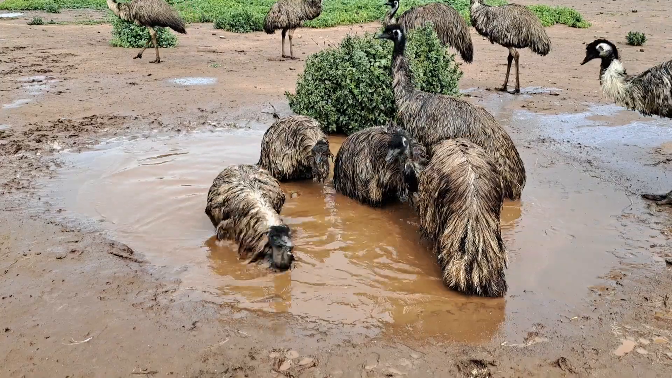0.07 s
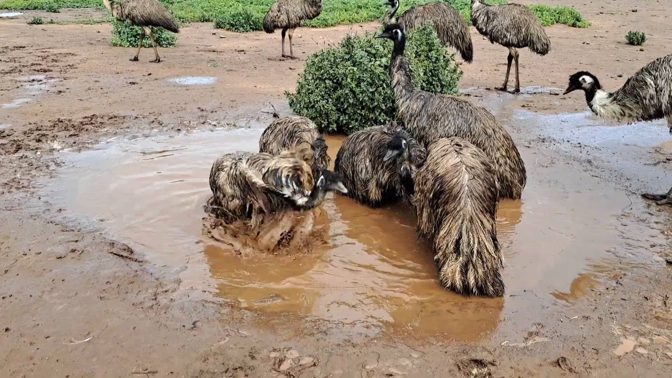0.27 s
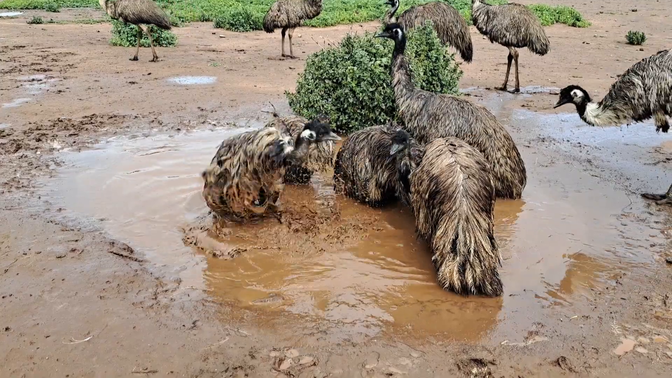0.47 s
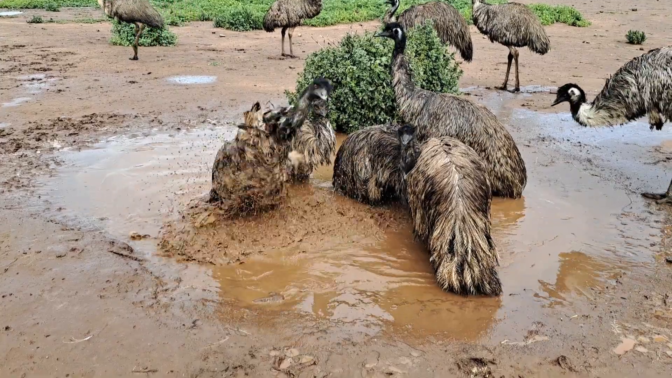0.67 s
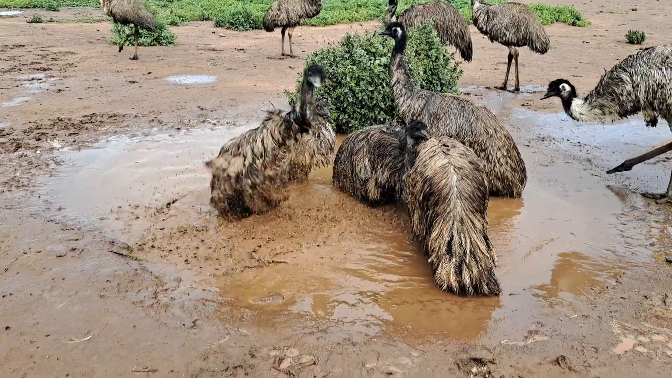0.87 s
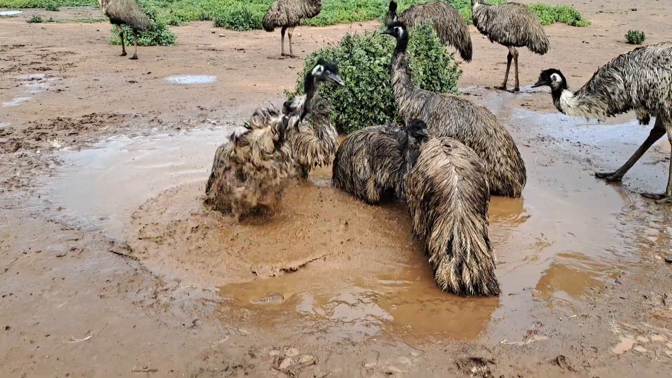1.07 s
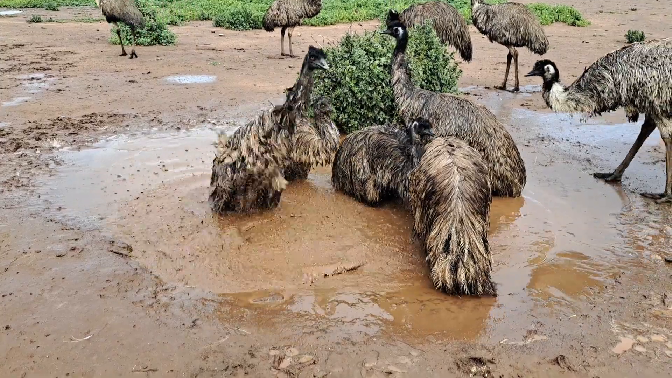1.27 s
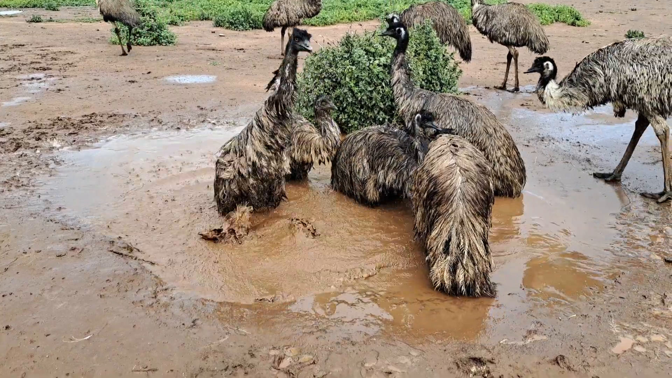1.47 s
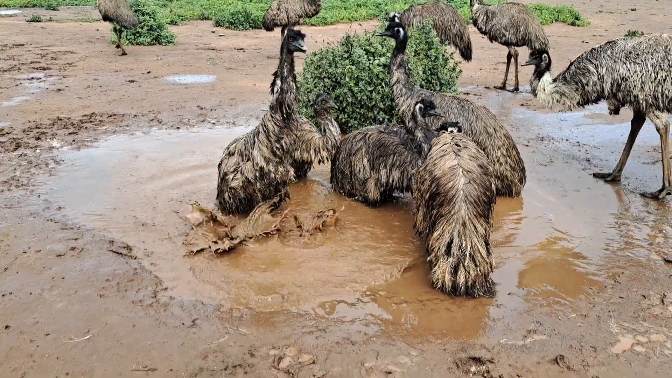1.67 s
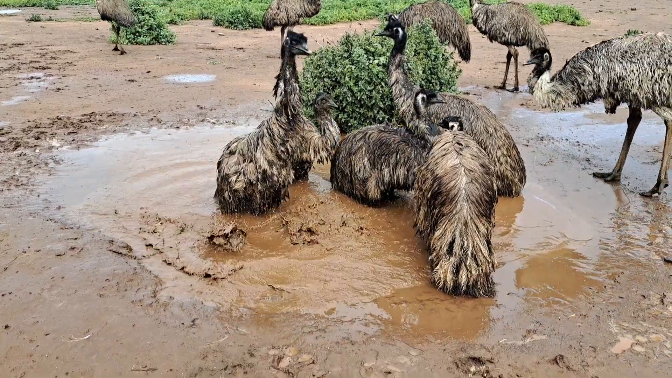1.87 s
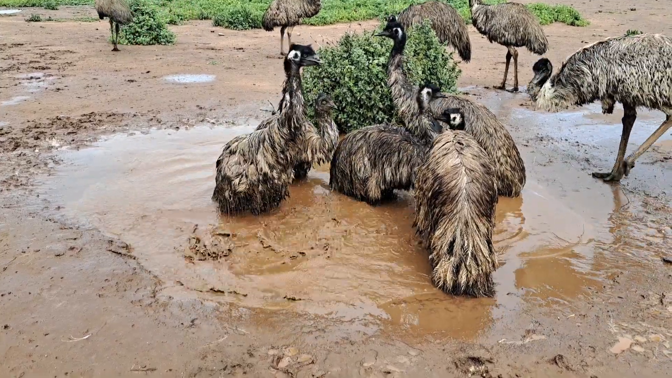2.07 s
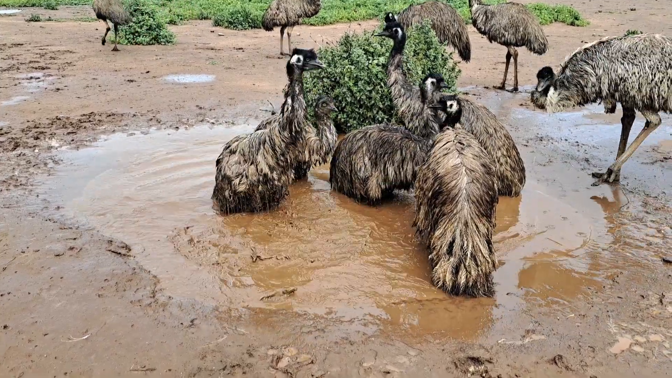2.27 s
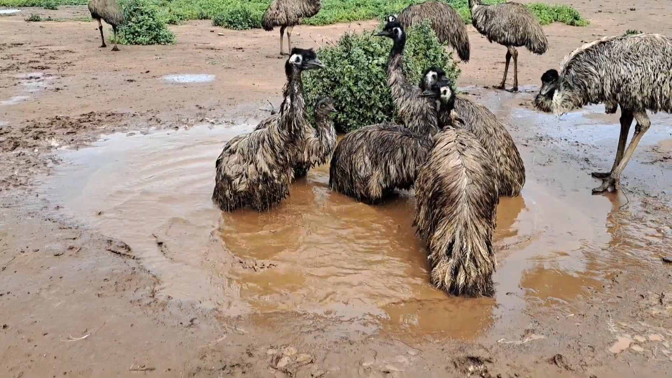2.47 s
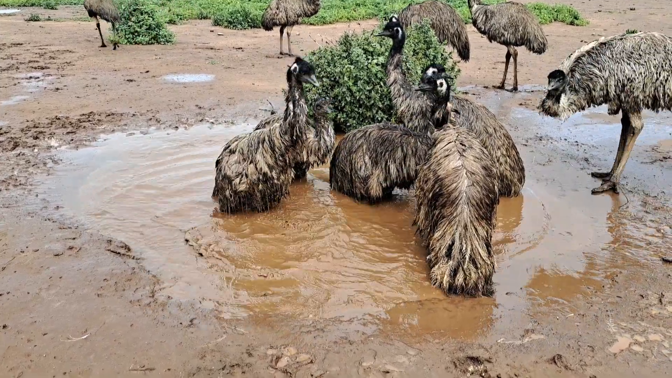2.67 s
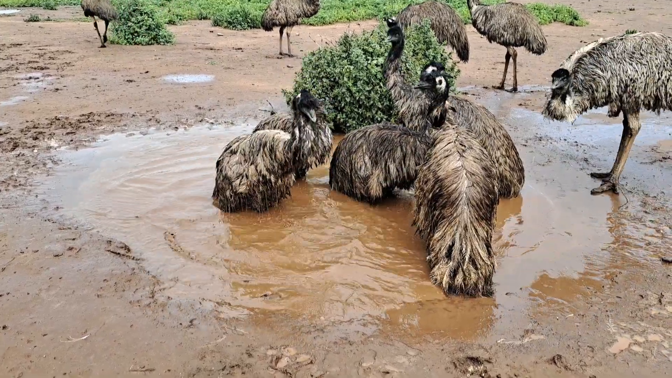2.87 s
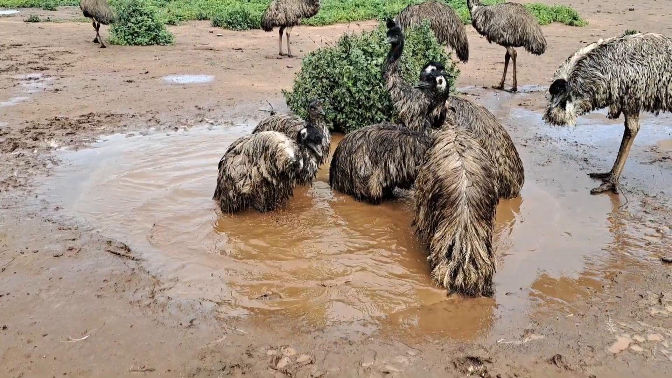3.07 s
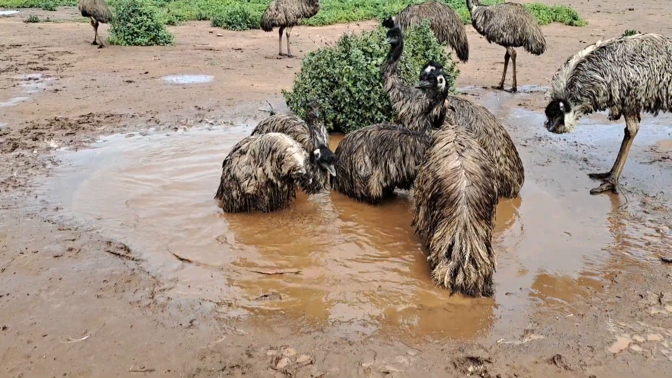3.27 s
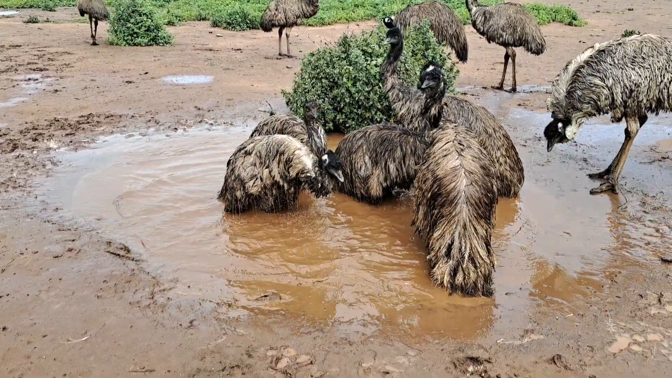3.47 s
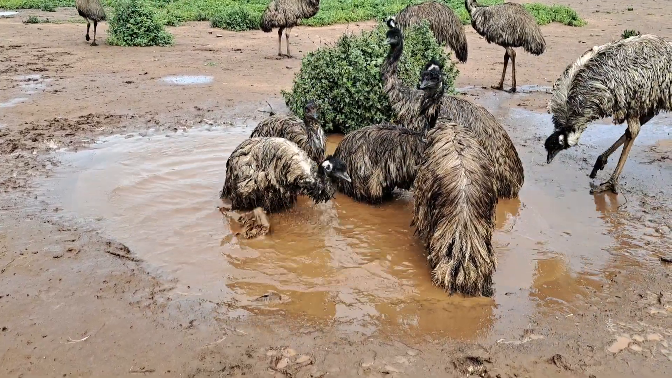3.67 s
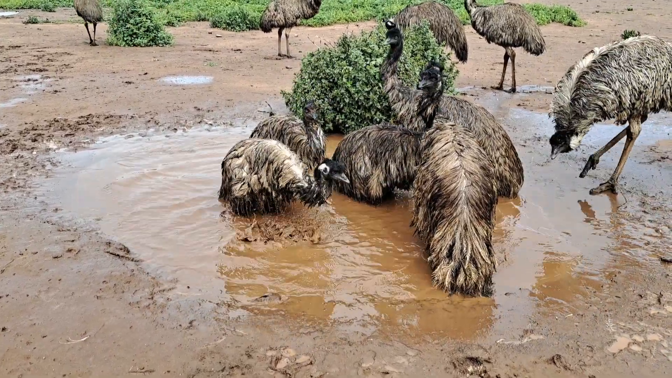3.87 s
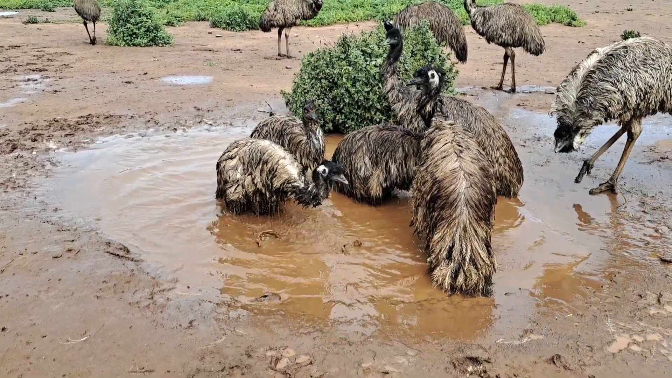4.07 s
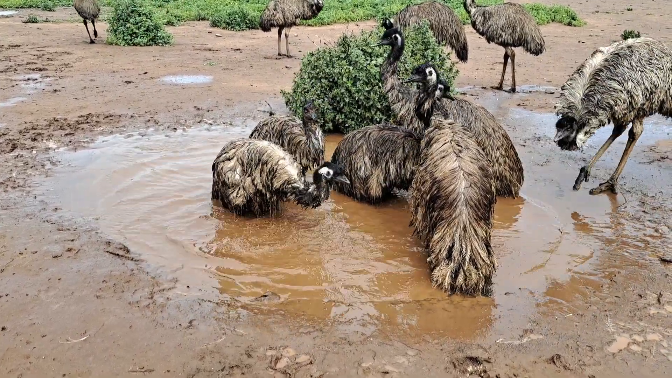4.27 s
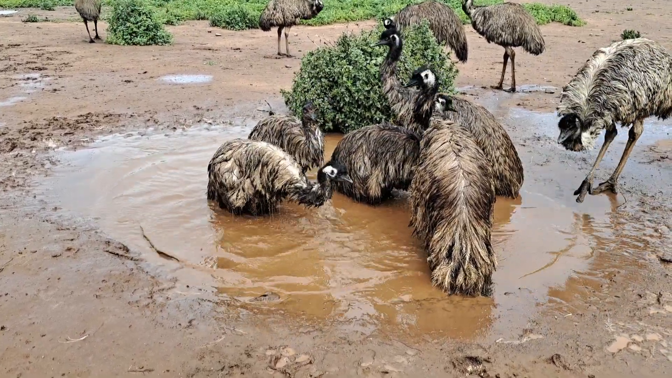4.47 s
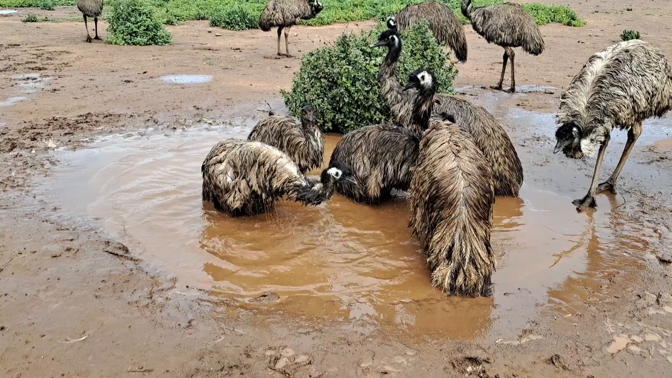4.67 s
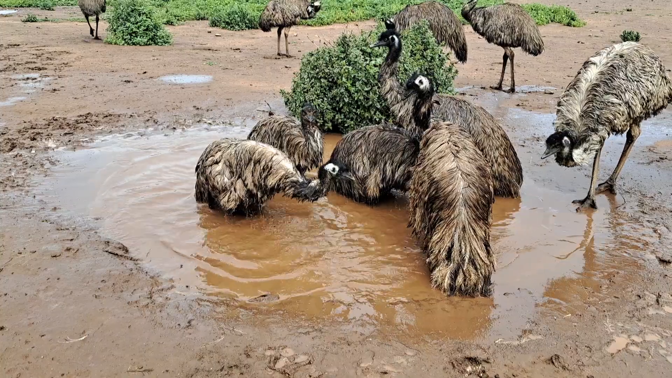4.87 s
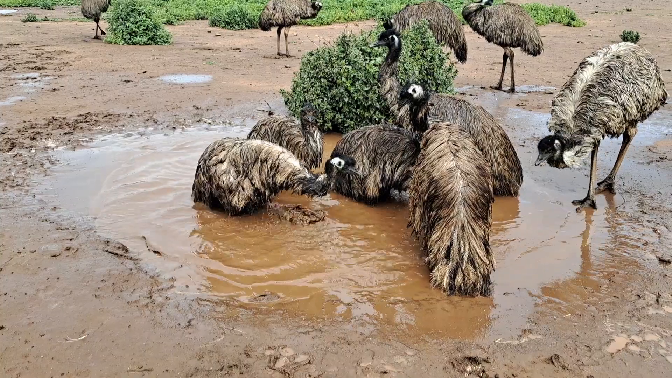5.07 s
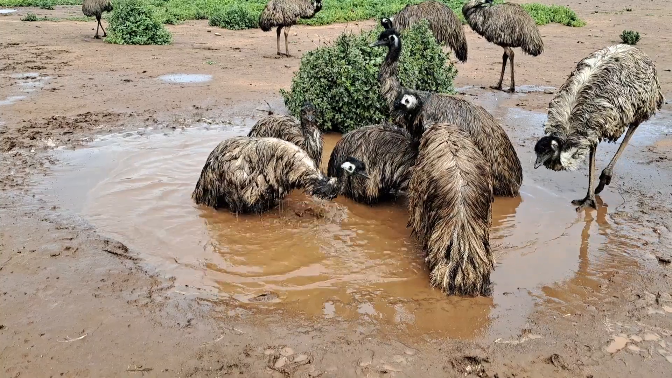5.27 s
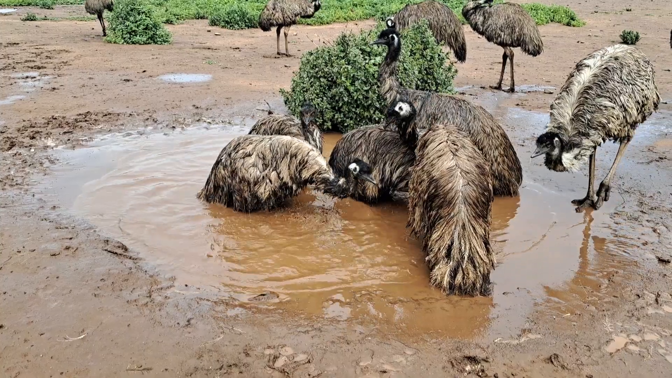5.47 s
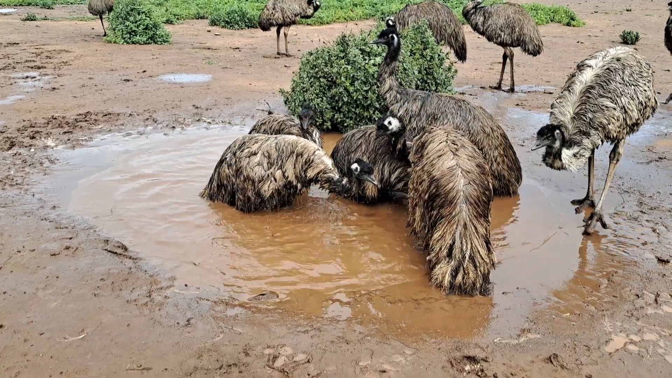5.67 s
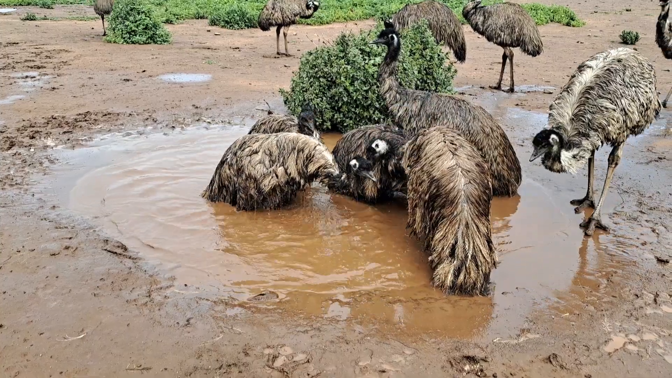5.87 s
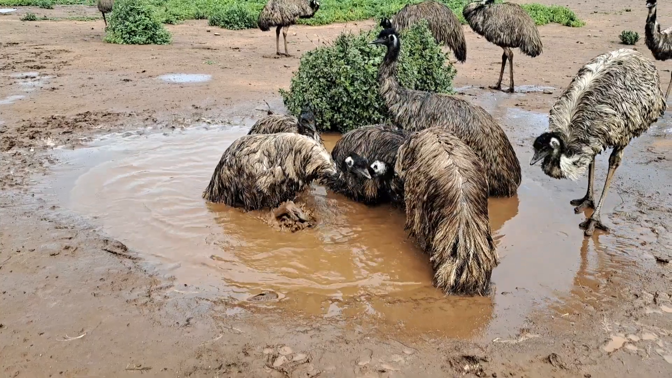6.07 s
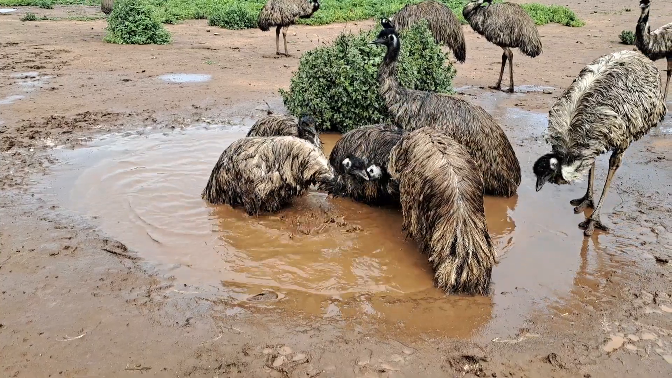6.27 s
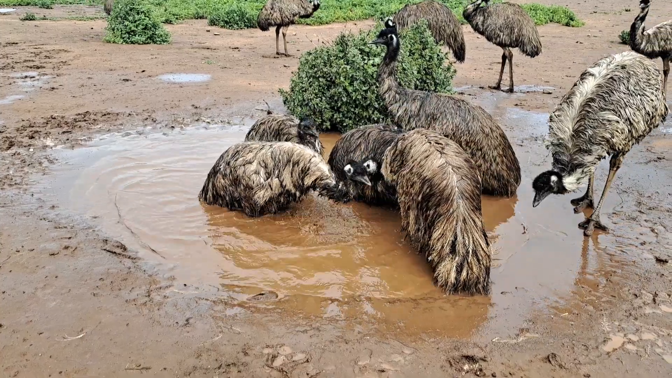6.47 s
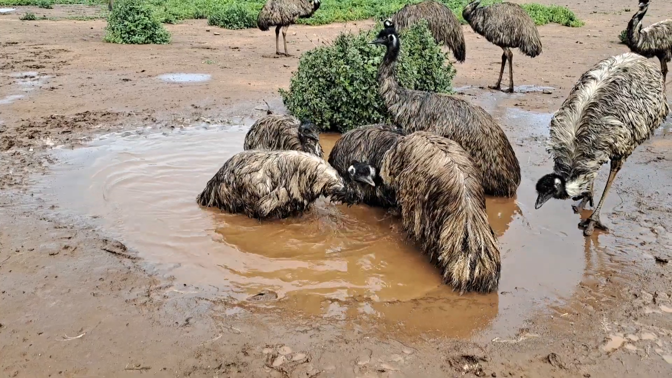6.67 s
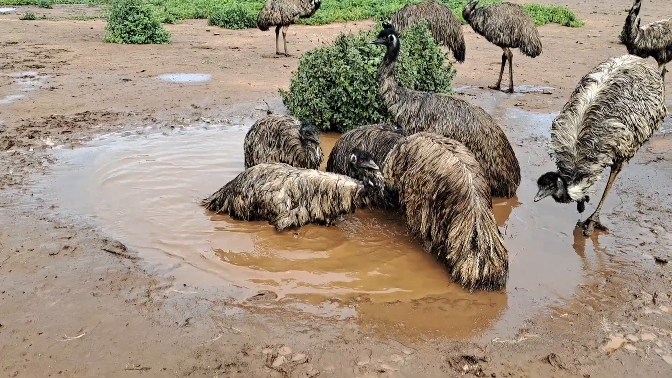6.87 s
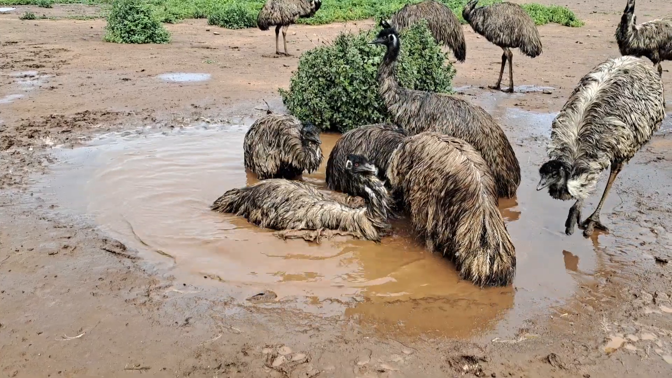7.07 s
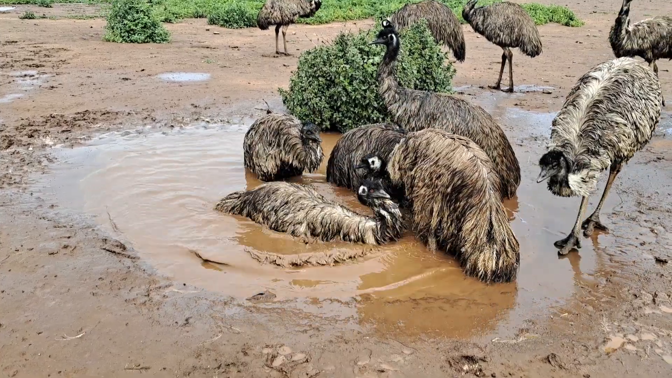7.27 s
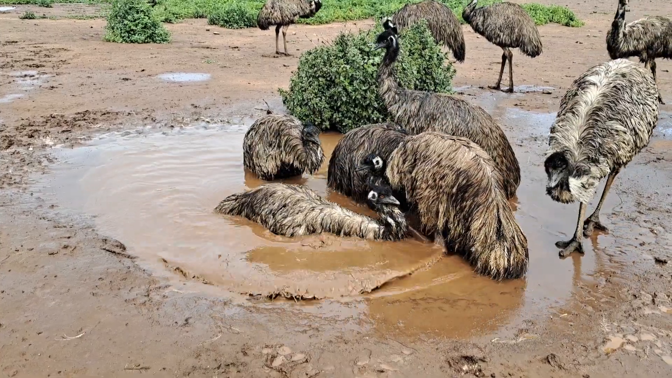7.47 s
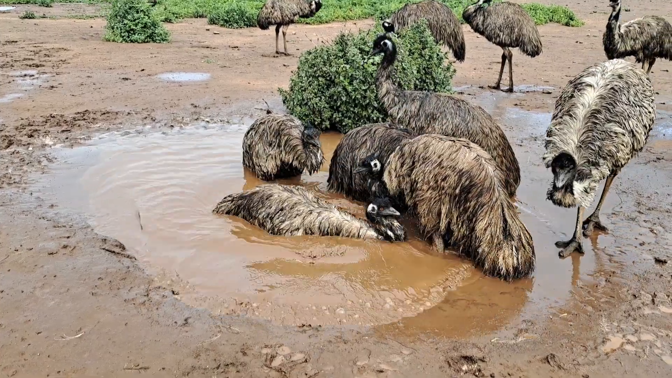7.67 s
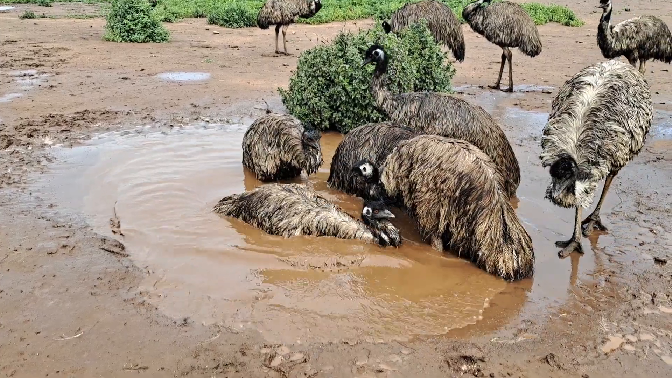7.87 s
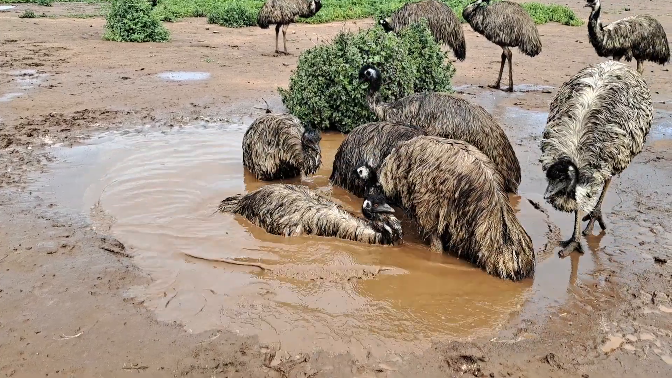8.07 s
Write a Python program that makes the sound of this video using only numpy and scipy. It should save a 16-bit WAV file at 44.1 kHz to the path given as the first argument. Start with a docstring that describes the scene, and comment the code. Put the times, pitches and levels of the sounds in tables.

```python
"""Emus bathing in a puddle

One bird shakes its soaked feathers, then a body or leg sweeps through the shallow muddy water.
Swarms of damped rising sines make the stirred bubbles, pattering drops and plops; noise adds churn and hiss.
Air pockets gulp as gliding sines, and sheets of water slap as bandpassed noise bursts.
The hand on the camera thumps (low sines), creaks (runs of knocks), rumbles and rubs (shaped noise).
A short diffuse tail surrounds the water, over faint open air."""
import sys
import numpy as np
from scipy import signal
from scipy.fft import rfft, irfft, next_fast_len
from scipy.io import wavfile
from scipy.ndimage import uniform_filter1d, map_coordinates

SR = 44100
rng = np.random.default_rng(int(sys.argv[2]) if len(sys.argv) > 2 else 0)


def materialize(psi):
    """Save the field psi as 16-bit PCM at rate SR to the path in sys.argv[1].

    A 1-D psi becomes a single channel; in a 2-D psi each row is a channel.
    """
    bounded = np.clip(np.atleast_2d(psi).T, -1, 1)
    quanta = np.round(bounded * 32767).astype(np.int16)
    wavfile.write(sys.argv[1], SR, quanta)


N = 358136

# One bird rolls and shakes its feathers. Each row: time in seconds, relative slosh in dB, relative spray in dB.
SHAKE = [(.25, -54, -57), (.33, -45, -51), (.48, -37.5, -42), (.6, -45, -46), (.72, -43, -43),
         (.92, -42, -41), (.99, -49, -47.5), (1.13, -46, -49), (1.2, -43, -43), (1.27, -46, -49),
         (1.34, -59, -57)]
# A body or leg sweeps through the water.
# Each row: start in seconds, length in seconds, relative slosh in dB, relative spray in dB.
STROKES = [(0.12, .1, -52, -57), (1.384, .06, -36, -53), (1.45, .09, -43, -55), (1.55, .03, -34, -35),
           (1.591, .07, -44, -48), (1.67, .04, -41, -55), (1.71, .04, -34, -41), (1.77, .1, -40, -42),
           (1.89, .15, -52, -53), (2.08, .055, -45, -47), (3.364, .065, -57, -61), (3.711, .06, -42, -58),
           (3.781, .05, -48, -59), (3.838, .033, -35, -45), (3.88, .15, -46, -52), (4.3, .18, -67, -70),
           (5.125, .035, -49, -63), (5.195, .05, -57, -60), (5.26, .035, -51, -55), (6.045, .073, -44, -55),
           (6.14, .06, -56, -59), (6.205, .02, -35, -40), (6.28, .03, -46, -46), (6.319, .11, -55, -57),
           (6.519, .1, -55, -66), (6.712, .018, -48, -48), (6.75, .8, -59, -59), (6.991, .1, -56, -62),
           (7.235, .075, -45, -58), (7.565, .075, -45, -50), (7.65, .06, -53, -61), (7.9, .22, -68, -72)]
# Air pockets closing in the water.
# Each row: start in seconds, relative level in dB, nominal pitch in Hz, 60 dB decay time in seconds.
GULPS = [(0.116, -32, 385, 0.019), (0.217, -28.5, 1478, 0.064), (0.311, -27.5, 669, .076),
         (0.428, -15.5, 381, 0.071), (0.47, -28, 363.4, 0.17), (0.574, -28.5, 1453, 0.048),
         (1.012, -22, 860, 0.061), (1.096, -27.5, 947, 0.048), (1.165, -31, 876, .087),
         (1.26, -21.5, 820, 0.035), (1.381, -22, 873, 0.053), (1.421, -21, 730, 0.057),
         (1.56, -23.5, 355, .078), (1.7, -18, 645, 0.061), (1.721, -20.5, 343, 0.057),
         (1.815, -14.5, 884, 0.023), (2.064, -22.5, 1530, 0.017), (2.36, -41, 976, 0.15),
         (2.398, -33, 1443, 0.049), (2.859, -46, 630, 0.11), (3.015, -42.5, 932, 0.074),
         (3.362, -42.5, 780, 0.12), (3.406, -40, 1100, 0.043), (3.483, -47, 1110, 0.039),
         (3.53, -47, 824, 0.1), (3.714, -32.5, 878, .089), (3.745, -30, 1400, 0.074),
         (3.812, -27.5, 860, 0.076), (3.843, -22.5, 927, 0.045), (3.986, -28, 910, 0.034),
         (4.032, -41, 1100, 0.065), (5.112, -39, 377, 0.11), (5.125, -32.5, 720, .11),
         (5.155, -45, 1130, 0.064), (5.258, -32.5, 633, 0.033), (5.414, -43.5, 1320, 0.06),
         (5.506, -42.5, 1034, 0.08), (5.782, -50.5, 1416, 0.11), (6.049, -33.5, 932, 0.11),
         (6.096, -25.5, 960, 0.049), (6.205, -23.5, 856, .04), (6.287, -37, 1420, 0.072),
         (6.515, -41, 1404, 0.1), (6.713, -37, 970, 0.03), (6.809, -32, 755, 0.025),
         (7.071, -23.5, 840, 0.02), (7.225, -32.5, 325, 0.078), (7.26, -26, 810, 0.061),
         (7.291, -30.5, 734, 0.078), (7.565, -38.5, 577, 0.092), (7.624, -34, 346.5, 0.091)]
# Sheets of water slapping down. Each row: start in seconds, relative level in dB, centre in Hz.
SLAPS = [(0.1158, -42.5, 2304), (0.4213, -26.5, 10530), (1.5396, -21.5, 3370), (1.561, -12.5, 2610),
         (1.788, -29.5, 4530), (1.885, -49, 3950), (2.089, -28, 6840), (2.281, -36.5, 2390),
         (2.487, -41.5, 6240), (3.847, -23, 5330), (3.953, -32.5, 3100), (4.0721, -38, 3480),
         (5.2562, -39.5, 3300), (5.2833, -35, 2640), (6.09, -33, 2360), (6.2122, -26.5, 3800),
         (6.2798, -27, 4360), (6.422, -51, 3200), (6.714, -32.5, 4130), (6.82, -31.5, 4050),
         (6.8747, -33, 2780), (7.044, -35.5, 2370), (7.391, -38.5, 4050), (7.5722, -29, 2350),
         (7.6217, -35, 4940)]
# The grip bumping the camera.
# Each row: start in seconds, relative level in dB, nominal pitch in Hz, nominal push length in seconds.
THUMPS = [(0.119, -35.5, 112.5, .008), (0.157, -38, 142.5, 0.0083), (0.757, -30.5, 131.6, 0.015),
          (0.913, -42.5, 141, .01), (1.099, -31, 138.7, 0.033), (1.369, -29.5, 130, 0.034),
          (1.555, -35, 120, 0.038), (1.9, -39.5, 133, 0.0088), (2.036, -31, 124, 0.0094),
          (2.122, -29.5, 141, 0.0046), (2.508, -29.5, 126.3, 0.026), (2.548, -29.5, 137.5, 0.027),
          (2.745, -29, 123.5, .009), (2.935, -27.5, 131, 0.0079), (2.962, -34, 139, 0.032),
          (3.09, -30, 125, 0.038), (3.226, -33.5, 119.4, 0.064), (3.304, -27.5, 136.6, 0.04),
          (3.966, -46.5, 133, .029), (4.03, -45, 144, 0.016), (4.354, -42.5, 130, 0.05),
          (4.682, -47, 133, 0.055), (4.787, -52.5, 138, 0.038), (4.86, -52.5, 140, 0.049),
          (4.904, -44.5, 135, 0.034), (5.024, -52, 143, 0.072), (5.189, -50.5, 140, 0.096),
          (5.331, -54.5, 140, 0.042), (5.561, -48.5, 134.3, .075), (5.758, -49.5, 134.4, 0.064),
          (6.07, -50.5, 129, 0.036), (6.123, -48, 176, 0.018), (6.342, -50, 122, 0.017),
          (6.392, -43.5, 133, 0.026), (6.564, -45.5, 118.4, .013), (6.811, -42.5, 131.5, .065),
          (6.911, -48, 138, 0.0092), (7.063, -44.5, 148.4, 0.0072), (7.12, -48.5, 170, 0.011),
          (7.495, -41.5, 161, 0.022), (7.693, -40.5, 171, 0.014)]
# The grip slipping in runs of knocks. Each row: start in seconds, run length in seconds, relative level in dB.
CREAKS = [(0.016, .04, -45.5), (1.975, .01, -39.5), (2.132, .01, -36), (4.039, .04, -46), (4.275, .1, -47),
          (4.646, .1, -46.5), (5.623, .01, -46), (5.882, .1, -48), (6.479, .01, -46), (7.223, .01, -39),
          (7.513, .04, -45), (7.603, .04, -40)]
# The hand shifting its hold.
# Each row: start in seconds, length in seconds, relative rumble in dB, relative rubbing in dB.
SHIFTS = [(0.0, .55, -45, -48.5), (0.626, 0.36, -49, -53), (1.093, 0.094, -49, -48), (1.327, .48, -47, -46),
          (1.868, 0.39, -46, -47.5), (2.33, 0.36, -45.5, -56.5), (2.757, 0.38, -49, -56),
          (3.302, 0.1, -41.5, -66), (3.584, 0.057, -53, -68.5), (3.782, 0.081, -58, -54),
          (4.025, 0.46, -53, -61), (4.365, 0.13, -49, -64), (5.686, 0.26, -56.5, -64),
          (6.482, 0.2, -53.5, -61), (7.212, .13, -87, -53.5), (7.482, 0.18, -45, -48.5),
          (7.88, 0.34, -47, -58.5)]
# Colour of stirred water. Each row: frequency in Hz, relative gain in dB.
SLOSH_COLOUR = [(250, -16), (450, -12), (620, -6), (880, 3.5), (1150, -1), (1450, 5), (2000, -4),
                (2500, -9), (3500, -4.5), (6000, -58)]
# Colour of falling drops. Each row: frequency in Hz, relative gain in dB.
SPRAY_COLOUR = [(1100, -28), (2400, 3.5), (3000, 2), (4000, 0.5), (6300, -2), (10000, -4), (15500, -8)]
# Colour of the hand's rumble. Each row: frequency in Hz, relative gain in dB.
RUMBLE_COLOUR = [(10, -0.5), (25, -17), (55, 4), (75, -1.5), (110, -4), (200, -10), (400, -64)]
# Colour of skin rubbing the case. Each row: frequency in Hz, relative gain in dB.
RUB_COLOUR = [(90, -24), (170, -0.5), (260, 2.5), (400, -3), (520, -12.5), (800, -31.5)]
# Colour of the open air. Each row: frequency in Hz, relative gain in dB.
AIR_COLOUR = [(30, 35.5), (120, 23), (300, 12), (600, 6), (900, -26), (1400, 14), (2100, -5), (2900, -70),
              (4500, -17.5), (10000, 4), (15500, -18)]
# Scattering by the water surface and banks. Each row: frequency in Hz, 60 dB decay time in seconds.
SCATTER = [(300, 0.025), (2000, 0.048), (12000, 0.025)]
# Colour of the microphone ports. Each row: frequency in Hz, gain in dB.
PORTS = [(2400, 0), (2900, -5), (4100, 3.5), (5200, 0.5), (6300, 1.5), (7400, 5.5), (8700, -0.5),
         (10800, 6.5), (12500, 0)]

STROKE_ATTACK_S, STROKE_RELEASE_DB_PER_S = 0.016, 330
FALLBACK_DB, FALLBACK_S = -10, 0.16  # flung water falls back quickly
DRAIN_DB, DRAIN_S = -13, 0.7  # soaked feathers drain for much longer
SETTLING_SLOSH_DB = -2  # sloshing raised by the draining water, against its patter
CALM_SLOSH_DB, CALM_SPRAY_DB = -80, -72
CLUMPS_PER_S, CLUMPS_DB = 18, 1.82  # water comes back in uneven clumps
COARSE_HZ, COARSE_DB = 5340, -3.5  # treble cut of a stroke's big drops
GULP_RISE, GULP_RISE_S = 0.358, 0.0445  # share by which the pitch climbs, time constant
SLAP_T60_S, SLAP_RISE_S = 0.032, 0.0021
SLIP_EVERY_S = 0.028
HAND_ATTACK_S, HAND_RELEASE_DB_PER_S = 0.018, 215
BUMP_RUMBLE_DB, BUMP_RUB_DB, BUMP_SWAY_S = -12, -19, 0.034  # sway and rubbing after each bump
SWAY_GROWS = 0.98  # dB of sway per dB of bump
STILL_RUMBLE_DB, STILL_RUB_DB = -85, -70
TOP_HZ = 15850


def amp(db):
    """Decibels to gain."""
    return 10 ** (np.asarray(db) / 20)


def level(power):
    """Power to decibels."""
    return 10 * np.log10(power + 1e-14)


def unit(x):
    """x at rms 1."""
    return x / np.sqrt(np.mean(x ** 2) + 1e-20)


def along(points, hz):
    """(Hz, value) points read on a log frequency axis."""
    f, v = np.transpose(points)
    return np.interp(np.log(hz + 1), np.log(f + 1), v)


def curves(rows):
    """One value per sample for each column after the time."""
    s, *cols = np.transpose(rows)
    return [np.interp(np.arange(N) / SR, s, c) for c in cols]


def wobble(rate):
    """A random curve with rate knots a second, joined by straight lines."""
    knots = rng.standard_normal(int(N * rate / SR) + 4)
    return map_coordinates(knots, [np.arange(N) * rate / SR], order=1)


def filtered(x, response):
    """x times a response of frequency."""
    size = next_fast_len(x.shape[-1] + 8192)
    spectrum = rfft(x, size) * response(np.fft.rfftfreq(size, 1 / SR))
    return irfft(spectrum, size)[..., :x.shape[-1]]


def coloured(x, spectrum):
    """x shaped by a spectrum, at rms 1."""
    return unit(filtered(x, lambda hz: amp(along(spectrum, hz))))


def noise(spectrum, width):
    """Stereo noise; width is the side against the mid."""
    mid, side = coloured(rng.standard_normal((2, N)), spectrum)
    return np.array([mid + width * side, mid - width * side])


def add(track, s, sound):
    """Mix a sound into a track at s seconds."""
    start = max(0, round(s * SR))
    part = sound[..., :track.shape[-1] - start]
    track[..., start:start + part.shape[-1]] += part


def steadied(x, span):
    """x with its slow level held near 1, keeping grains shorter than span seconds."""
    size = max(3, int(span * SR))
    power = uniform_filter1d(uniform_filter1d(np.mean(x ** 2, axis=0), size), size)
    return x / np.sqrt(np.abs(power) + 1e-12)


def swells(events, attack_s, release_db_per_s):
    """Summed power of (s, length s, dB) events that build up, hold and fall away."""
    power, t = np.zeros(N), np.arange(N) / SR
    for s, length, db in events:
        near = slice(max(0, int((s - .5) * SR)), int((s + length + .5) * SR))
        age = t[near] - s
        attack = (1 + np.tanh(age / attack_s)) / 2
        release = amp(db - release_db_per_s * np.maximum(age - length, 0))
        power[near] += (attack * release) ** 2
    return power


def lingering(power, seconds):
    """Power spread out into an exponential tail."""
    keep = np.exp(-1 / (seconds * SR))
    return signal.lfilter([1 - keep], [1, -keep], power)


def bubbles(rate, low_hz, high_hz, cycles, rise, size_db, lag_ms, spread_ms, size):
    """A swarm of damped rising sines, rate a second, each with its own lag between the microphones."""
    total = np.cumsum(rate * np.ones(N)) / SR
    count = min(int(total[-1]), 5000000 // size)  # capped to limit memory
    when, pitch, strength, place, life = rng.random((count, 5)).T[..., None]
    start = np.searchsorted(total, when * total[-1])
    hz = low_hz * (high_hz / low_hz) ** pitch
    gain = amp(-size_db * np.log(1 - .99 * strength))
    lag = (lag_ms + spread_ms * (2 * place - 1)) / 1000
    pair = []
    for delay in (-lag / 2, lag / 2):
        turns = np.maximum((np.arange(size) - 16) / SR - delay, 0) * hz
        age = turns / (cycles * (.5 + life))
        ring = np.sin(2 * np.pi * turns * (1 + rise * age / 2))
        ring = ring * np.exp(-np.pi * age) * (1 - np.exp(-2 * turns))
        where = (start + np.arange(size)).ravel()
        pair.append(np.bincount(where, (gain * ring).ravel(), N + size)[:N])
    return np.array(pair)


def from_puddle(x, lag_ms):
    """A sound from left of centre reaches the left microphone first."""
    sides = np.array([[1], [-1]])
    return filtered(x, lambda hz: np.exp(1j * np.pi * hz * lag_ms / 1000 * sides))


def stirring():
    """Shake and strokes throw up water, which falls back and drains from the feathers.
    Gives slosh, spray and draining in dB, and the coarse share of the spray."""
    t = np.arange(N) / SR
    outside_s = np.abs(t - np.clip(t, SHAKE[0][0], SHAKE[-1][0]))
    fade_db = STROKE_RELEASE_DB_PER_S * outside_s
    shake_slosh, shake_spray = (amp(db - fade_db) ** 2 for db in curves(SHAKE))

    def stroke_power(events):
        return swells(events, STROKE_ATTACK_S, STROKE_RELEASE_DB_PER_S)

    sloshed = shake_slosh + stroke_power([(s, length, db) for s, length, db, _ in STROKES])
    coarse = stroke_power([(s, length, db) for s, length, _, db in STROKES])
    thrown = shake_spray + coarse
    draining = amp(DRAIN_DB) ** 2 * lingering(thrown, DRAIN_S)
    returning = amp(FALLBACK_DB) ** 2 * lingering(thrown, FALLBACK_S) + draining
    clumps = amp(CLUMPS_DB * wobble(CLUMPS_PER_S)) ** 2
    drops = thrown + clumps * (returning + amp(CALM_SPRAY_DB) ** 2)
    settling = amp(SETTLING_SLOSH_DB) ** 2 * clumps * draining
    sloshed = sloshed + settling + amp(CALM_SLOSH_DB) ** 2
    return level(sloshed), level(drops), level(draining), coarse / drops


def slosh(level_db, spray_db, pockets):
    """Stirred water traps bubbles: harder stirring and thicker falling spray trap more."""
    rate = 100 + 1800 * amp(.7 * (level_db - level_db.max())) + 3500 * amp(spray_db - spray_db.max())
    swarm = bubbles(rate, low_hz=476.2, high_hz=4240, cycles=13.9, rise=0.18, size_db=4.5,
                    lag_ms=0.086, spread_ms=0.13, size=1150)
    churn = coloured(swarm, SLOSH_COLOUR) + amp(-12) * noise(SLOSH_COLOUR, width=.6)
    # air caught in one big pocket is not broken into small bubbles
    power = amp(level_db) ** 2
    held = np.abs(uniform_filter1d(pockets.mean(axis=0) ** 2, int(0.026 * SR)))
    share = power / (power + 0.44 * held)
    return amp(level_db - 0.48) * np.sqrt(share) * steadied(churn, span=0.02)


def spray(level_db):
    """Flung drops patter on the puddle, merging into a hiss when many; a few ring as tiny bubbles."""
    rate = 900 + 14000 * amp(.9 * (level_db - level_db.max()))
    drops = bubbles(rate, low_hz=2010, high_hz=14750, cycles=7.1, rise=0.26, size_db=3.5,
                    lag_ms=0.082, spread_ms=0.17, size=240)
    # small drops ring briefly: tilt their weight up
    drops = filtered(drops, lambda hz: hz / SR)
    patter = coloured(drops, SPRAY_COLOUR) + amp(-10.5) * noise(SPRAY_COLOUR, width=1.0)
    plinks = bubbles(25 + .05 * rate, low_hz=1867, high_hz=5594, cycles=34, rise=0.14, size_db=5.5,
                     lag_ms=.1, spread_ms=0.28, size=900)
    # weak spray traps few bubbles
    trapping = amp(level_db) / (amp(level_db) + amp(-62))
    ringing = amp(-4.0) * trapping * steadied(plinks, span=0.065)
    return amp(level_db - 1.22) * (steadied(patter, span=0.027) + ringing)


def coarsened(x, share):
    """Spray loses treble by the share of big drops in it."""
    treble = filtered(x, lambda hz: hz ** 4 / (hz ** 4 + COARSE_HZ ** 4))
    return x + share * (amp(COARSE_DB) - 1) * treble


def drips(level_db):
    """Big drops running off the feathers plop into the puddle, fewer as they drain."""
    rate = 2 + 70 * amp(level_db - level_db.max())
    plops = bubbles(rate, low_hz=753, high_hz=2640, cycles=36.7, rise=0.228, size_db=2.5,
                    lag_ms=0.064, spread_ms=0.18, size=3000)
    return amp(level_db - 5.5) * unit(plops)


def gulps():
    """An air pocket closes with a splat, rings and rises in pitch nearing the surface; two smaller break off."""
    out, t = np.zeros(N), np.arange(SR // 4) / SR
    knots = np.arange(0, t[-1], .005)

    def pocket(pitch, t60):
        # moving water squeezes the pocket: unsteady pitch
        unsteady = 0.028 * np.interp(t, knots, rng.standard_normal(len(knots)))
        glide = 1 + GULP_RISE * (1 - np.exp(-t / GULP_RISE_S)) + unsteady
        tone = np.sin(2 * np.pi * pitch * np.cumsum(glide) / SR)
        return tone * amp(-60 * t / t60) * (1 - np.exp(-t / 0.0023))

    for s, db, hz, t60 in GULPS:
        splat = coloured(rng.standard_normal(len(t)), SLOSH_COLOUR) * amp(-17 - 60 * t / .045)
        add(out, s, amp(db - 3) * (pocket(.94 * hz, t60) + splat))
        for wait, smaller in rng.random((2, 2)):
            fragment = pocket(hz * (1.1 + .6 * smaller), .4 * t60)
            add(out, s + .025 * wait, amp(db - 14) * fragment)
    return from_puddle(out, lag_ms=.09)


def slaps():
    """Each slap is a short spiky burst round its own centre, a little different at each microphone."""
    out, t = np.zeros((2, N)), np.arange(SR // 8) / SR
    for s, db, hz in SLAPS:
        spikes = amp(0.97 * rng.standard_normal(len(t)) - 60 * t / SLAP_T60_S)
        mid, side = rng.standard_normal((2, len(t))) * spikes
        pair = np.array([mid + side / 2, mid - side / 2]) * (1 - np.exp(-t / SLAP_RISE_S))
        width_hz = hz / 2
        burst = filtered(pair, lambda f: 1j * f * width_hz / (hz * hz - f * f + 1j * f * width_hz))
        # gentler slaps are duller
        edge_hz = 7000 * amp((db + 39) / 2)
        burst = filtered(burst, lambda f: 1 / (1 + 1j * f / edge_hz))
        add(out, s, amp(db - 25.0) * unit(burst))
    return from_puddle(out, lag_ms=0.06)


def scattered(x):
    """A very short diffuse tail, different at each microphone."""
    hz, t, z = signal.stft(rng.standard_normal((2, SR // 6)), SR, nperseg=128)
    decay = amp(-60 * t / along(SCATTER, hz)[:, None])
    tail = signal.istft(z * decay, SR, nperseg=128)[1]
    return signal.fftconvolve(x, tail / np.linalg.norm(tail[0]), axes=1)[:, :N]


def thumps():
    """A soft push makes the camera's body ring low, then die away."""
    out, t = np.zeros((2, N)), np.arange(SR // 3) / SR
    for s, db, hz, length in THUMPS:
        decay = amp(-60 * np.maximum(t - 0.66 * length, 0) / 0.13)
        swell = (1 - np.exp(-(t / 0.003) ** 2)) * decay
        # pitch sags as the pressure eases
        phase = 2 * np.pi * hz * np.cumsum(0.973 + 0.17 * np.exp(-t / 0.0044)) / SR
        # the case rocks, moving the microphones against each other
        rocking = amp(-12.5) * np.sin(phase * rng.uniform(0.49, 1.154)) * np.array([[1], [-1]])
        add(out, s, amp(db + 6.0) * swell * (np.sin(phase) + rocking))
    return out


def creaks():
    """Skin slips on the case in runs of short knocks."""
    out, t = np.zeros(N), np.arange(SR // 16) / SR
    for s, length, db in CREAKS:
        for wait in np.arange(0, length, SLIP_EVERY_S):
            hz = 275 * np.exp(.1 * rng.standard_normal())
            knock = np.sin(2 * np.pi * hz * t) * (t / .002) ** 2 * np.exp(-t / 0.0018)
            add(out, s + wait, amp(db + 5.0) * knock / np.abs(knock).max())
    return np.array([out, out])


def handling():
    """The hand rumbles and rubs whenever it shifts its hold or bumps the camera."""
    def moving(events):
        return swells(events, HAND_ATTACK_S, HAND_RELEASE_DB_PER_S)

    hardest = max(row[1] for row in THUMPS)
    sway = moving([(s, BUMP_SWAY_S, hardest + SWAY_GROWS * (db - hardest)) for s, db, _, _ in THUMPS])
    rumbling = moving([(s, length, db) for s, length, db, _ in SHIFTS])
    rubbing = moving([(s, length, db) for s, length, _, db in SHIFTS])
    rumble_db = level(rumbling + amp(BUMP_RUMBLE_DB) ** 2 * sway + amp(STILL_RUMBLE_DB) ** 2)
    rub_db = level(rubbing + amp(BUMP_RUB_DB) ** 2 * sway + amp(STILL_RUB_DB) ** 2)
    rumble = steadied(noise(RUMBLE_COLOUR, width=0.86) * amp(5.3 * wobble(16)), span=0.3)
    rub = steadied(noise(RUB_COLOUR, width=0.7) * amp(5.7 * wobble(70)), span=0.037)
    return amp(rumble_db + 5) * rumble + amp(rub_db - 0.5) * rub


def open_air():
    """Faint steady noise of the open air."""
    return amp(-67.5) * noise(AIR_COLOUR, width=0.5)


def scene():
    """The puddle, the hand on the camera and faint open air."""
    slosh_db, spray_db, draining_db, coarse = stirring()
    pockets = gulps()
    water = slosh(slosh_db, spray_db, pockets) + coarsened(spray(spray_db), coarse)
    water = water + drips(draining_db) + pockets + slaps()
    # long waves pass the low banks with little scattering
    echo = filtered(scattered(water), lambda hz: hz / (hz + 900))
    water = (water + amp(-2.5) * echo) * amp([[-.9], [.7]])  # left, right balance
    return water + thumps() + creaks() + handling() + open_air()


def record(dry):
    """The microphone ports colour the treble; the camera keeps nothing from its band limit up."""
    return filtered(dry, lambda hz: amp(along(PORTS, hz)) * (hz < TOP_HZ))


dry = scene()
out = record(dry)
materialize(out)
```